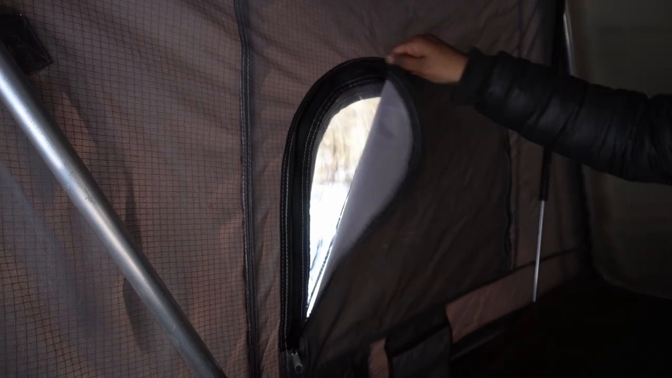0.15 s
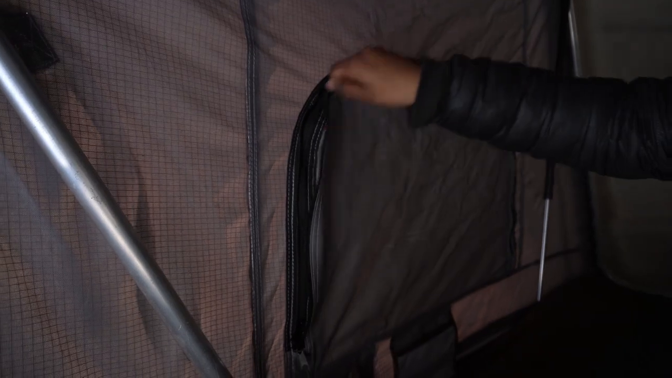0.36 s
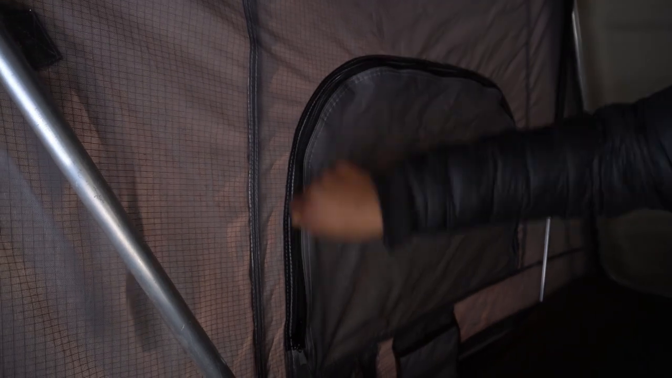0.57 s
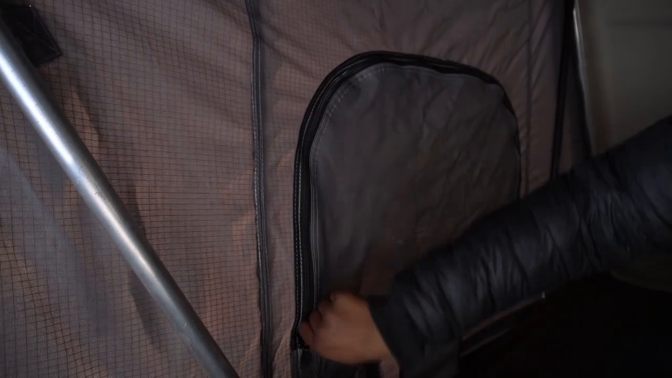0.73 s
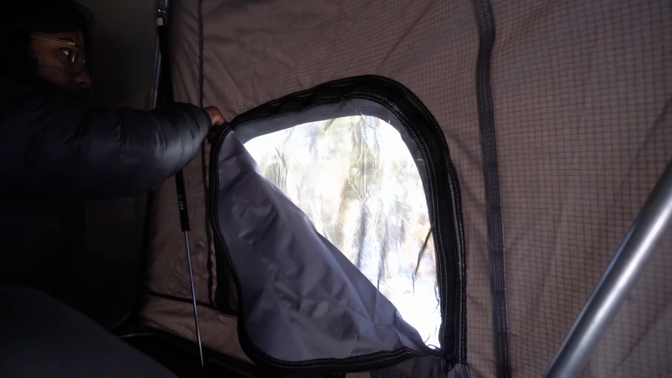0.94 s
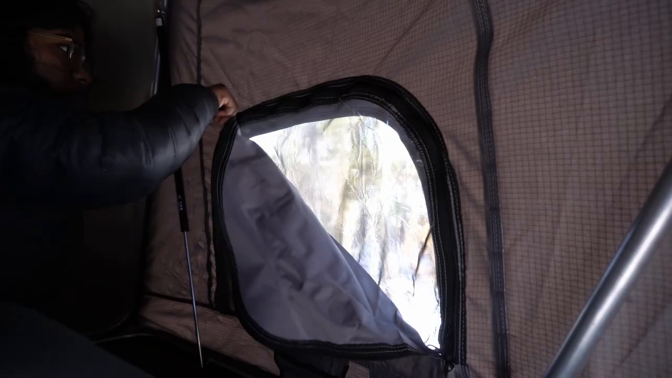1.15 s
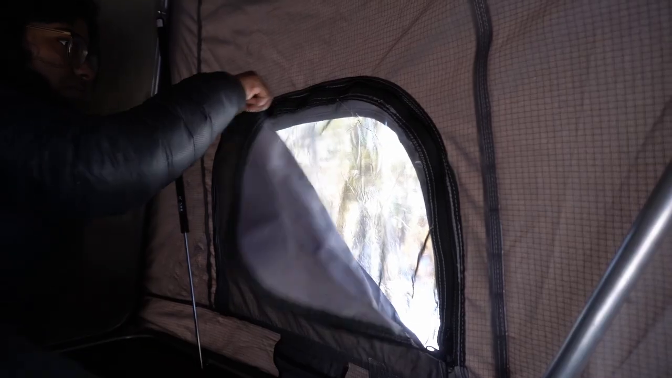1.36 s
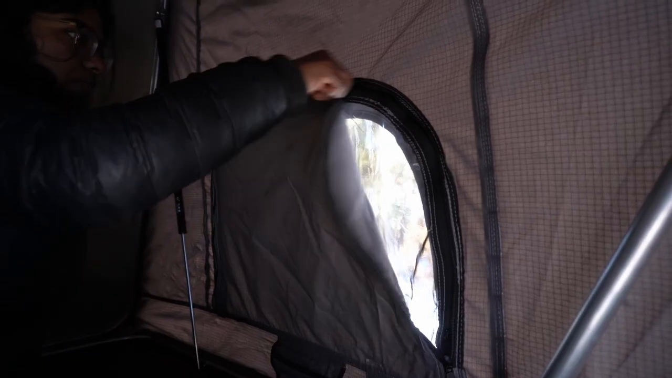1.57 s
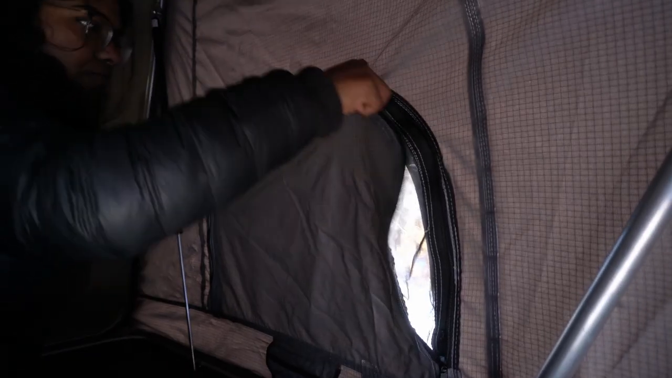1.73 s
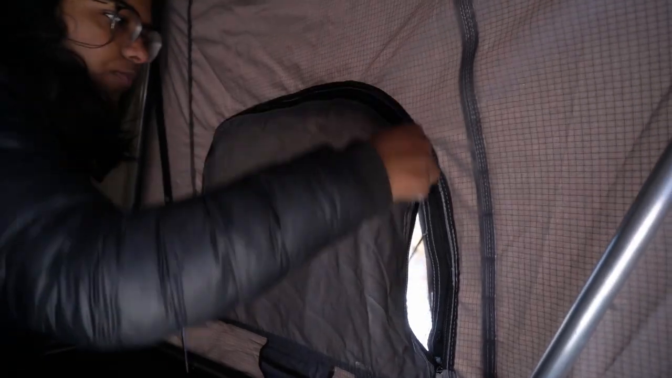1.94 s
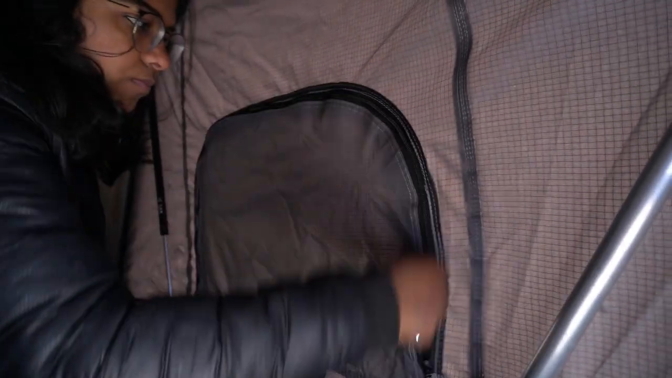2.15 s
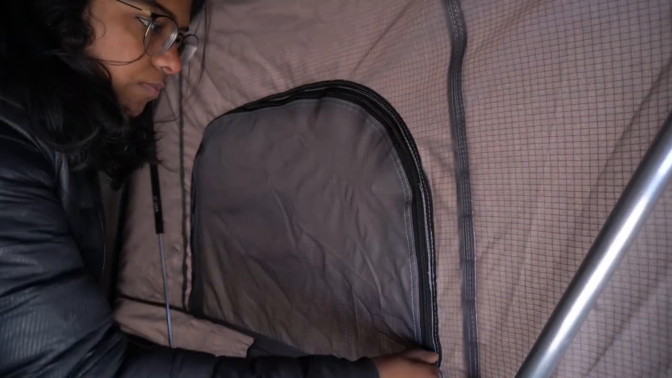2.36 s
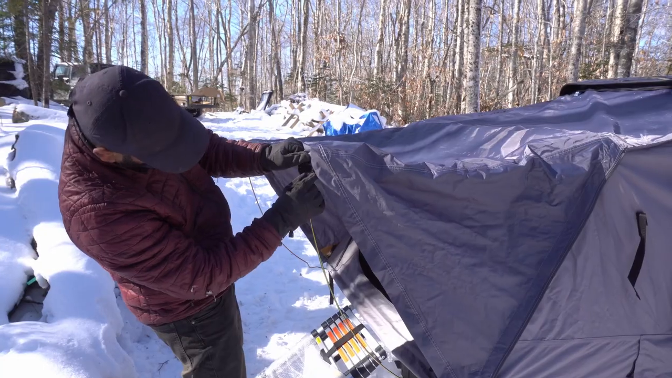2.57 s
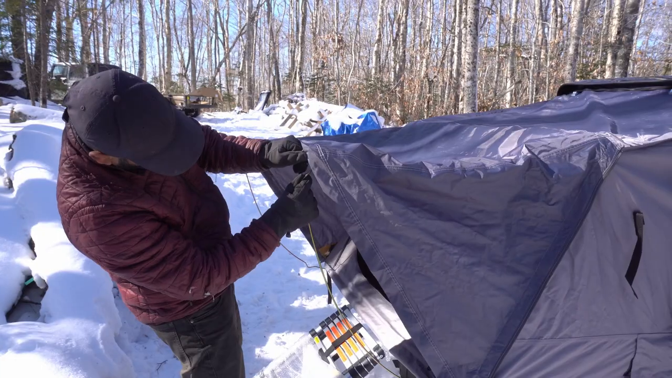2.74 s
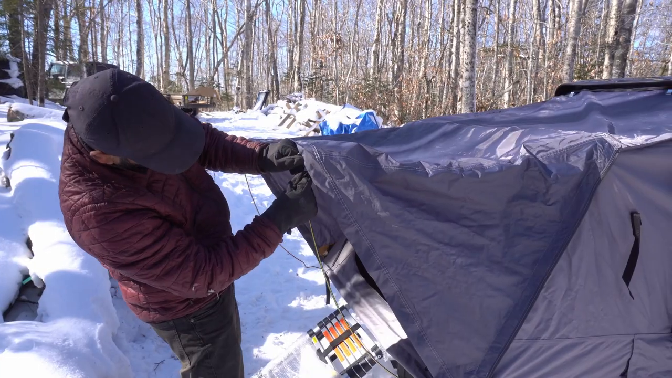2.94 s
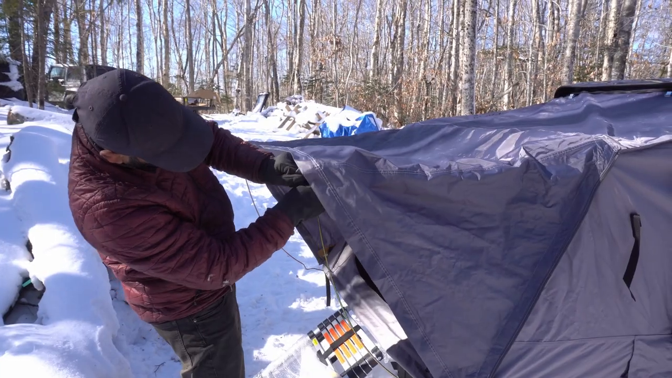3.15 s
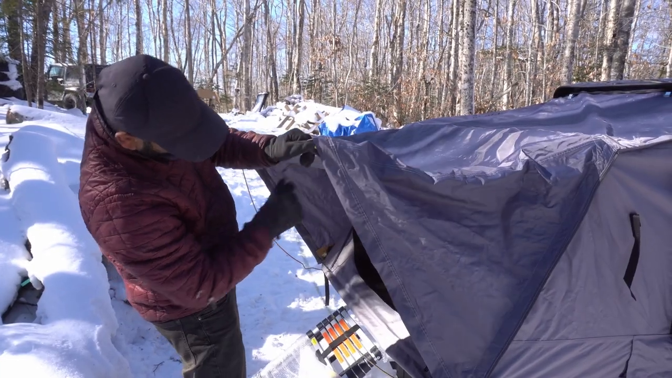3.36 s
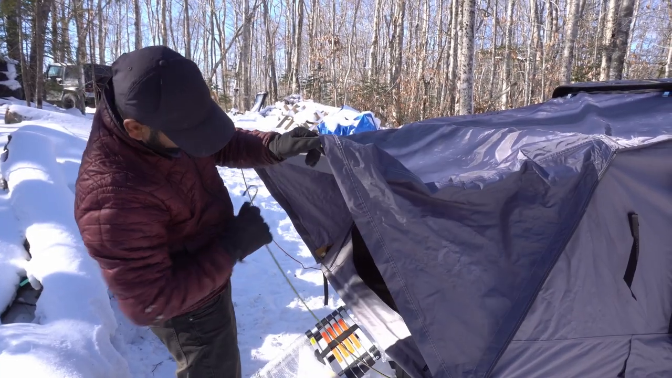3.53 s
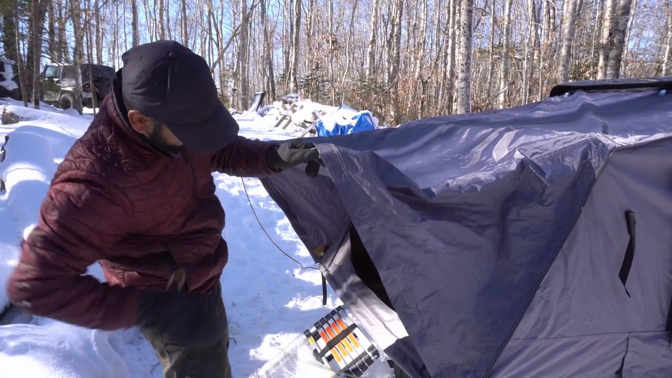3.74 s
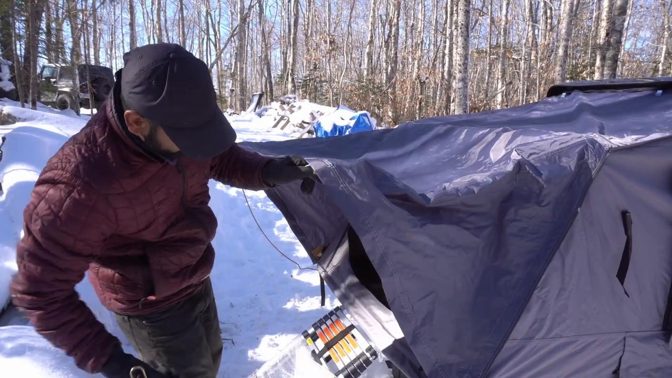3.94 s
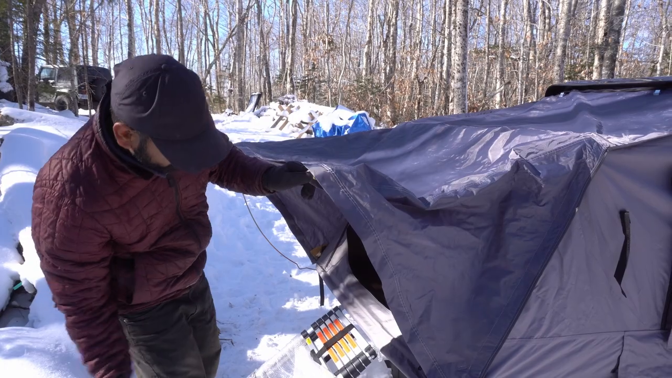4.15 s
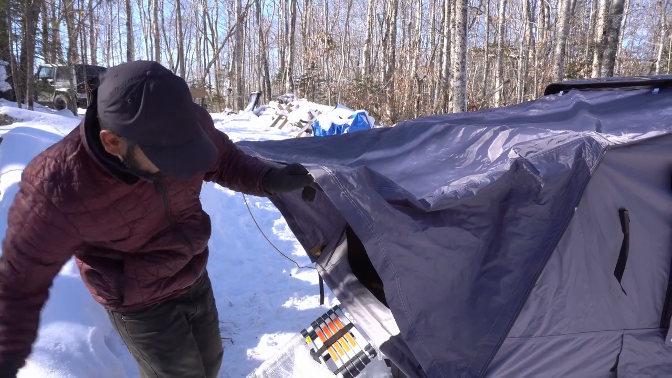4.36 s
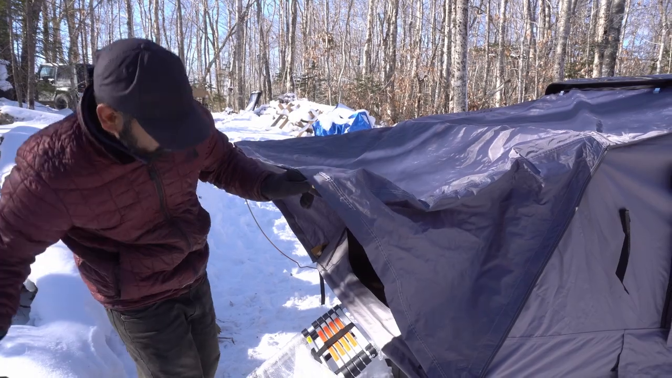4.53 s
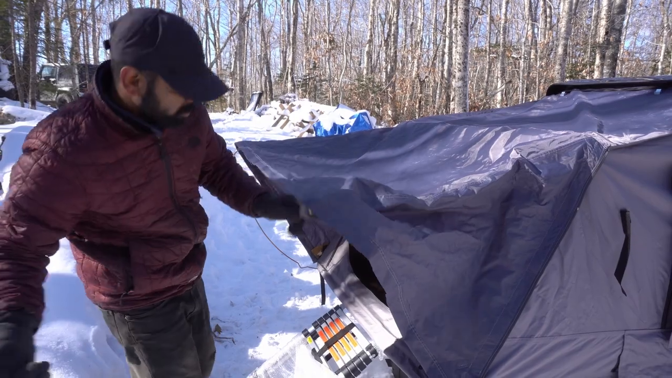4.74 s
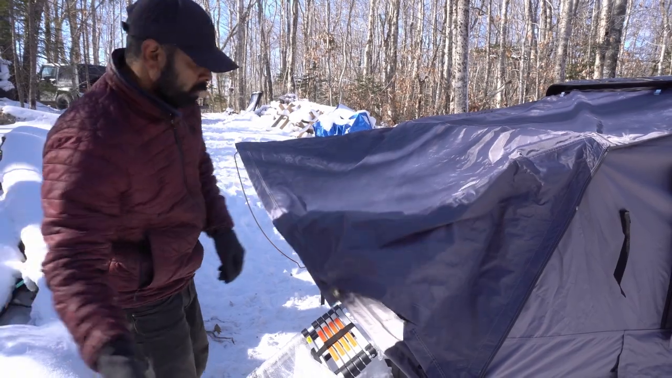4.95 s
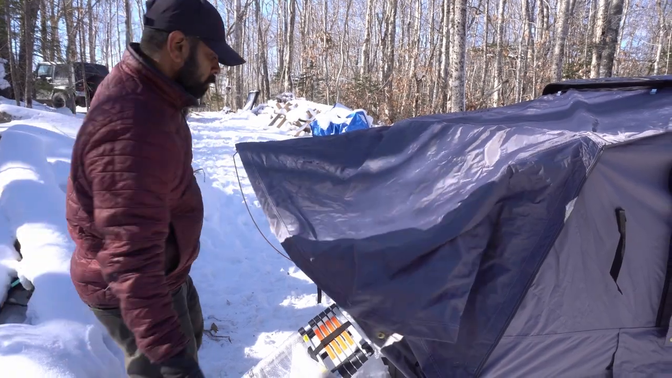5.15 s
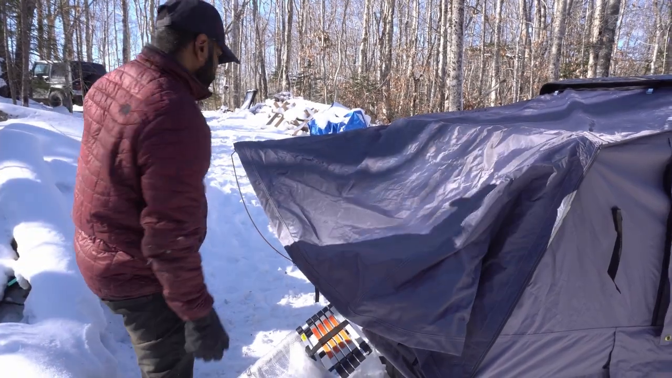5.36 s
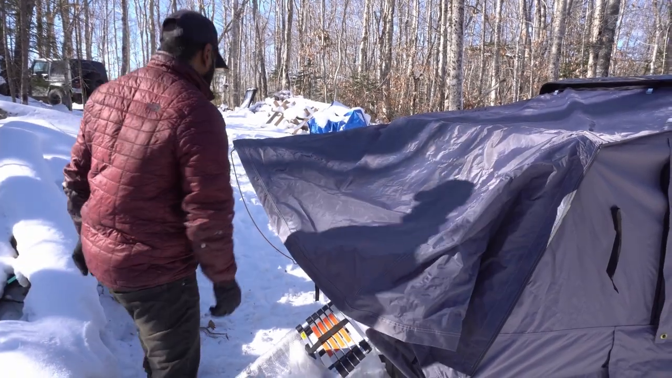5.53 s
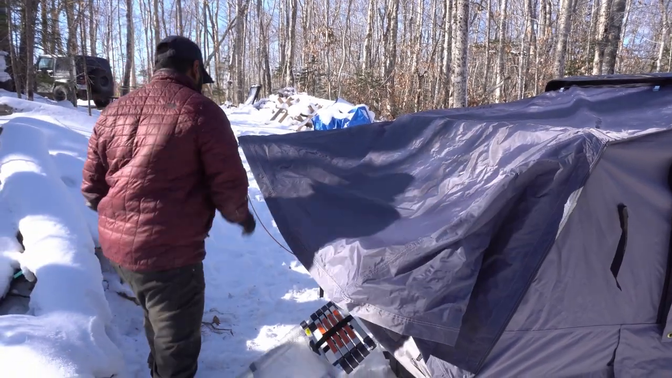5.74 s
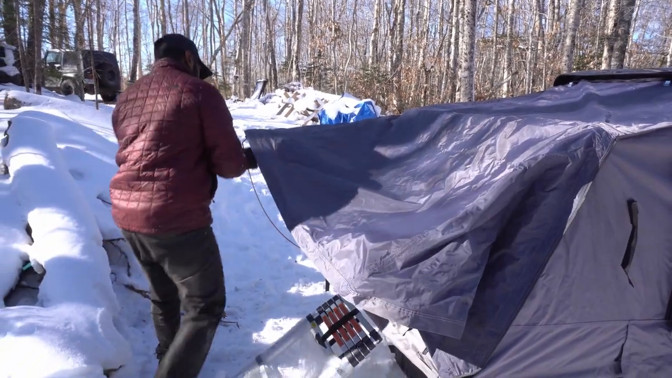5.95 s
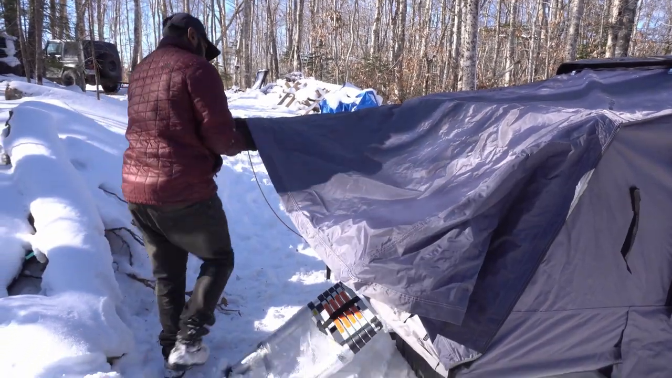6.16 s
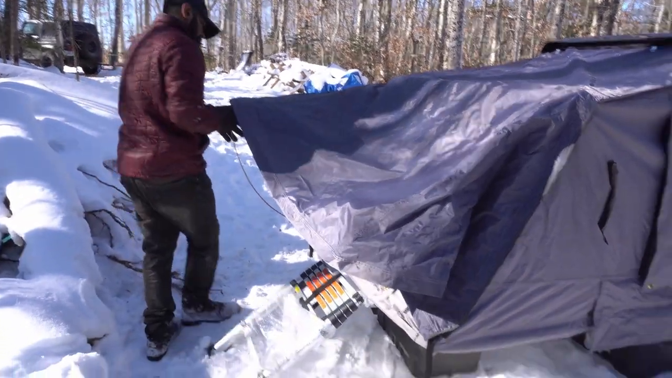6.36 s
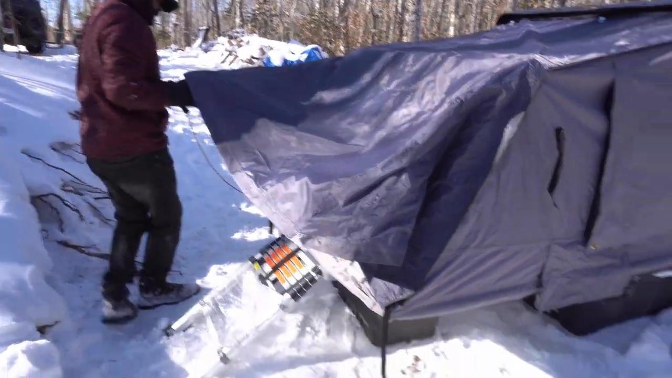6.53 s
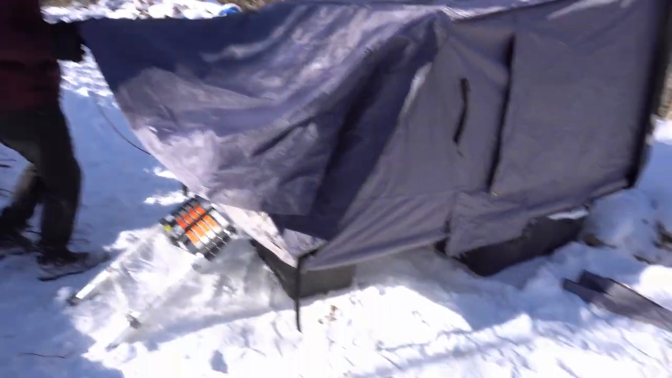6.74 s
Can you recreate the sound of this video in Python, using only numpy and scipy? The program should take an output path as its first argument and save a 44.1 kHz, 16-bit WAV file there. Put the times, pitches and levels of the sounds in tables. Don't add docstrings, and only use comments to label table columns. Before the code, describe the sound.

From 0 to 0.9 s a zipper is run shut very close by, in three quick tugs: a fast, smooth tooth buzz with a bright scraping hiss, tiny tab clinks and a sharp click at the stop. After a short gap with a cloth snap, the second zipper begins at 1.1 s with a slow, low ratchet, jumps at 1.4 s to a loud, fuller buzz drumming on loose fabric, dips near 1.8 s, then rises through two more tugs to a hard clack at 2.4 s. Outdoors, stiff nylon rustles softly, busier around 3.2-3.5 s, with small pops and ticks until 4.7 s. Snow crust crunches from 4.9 s; at 5.43 s steel pegs clash brightly and ring, with more clinks at 5.7-5.9 s. It quiens to faint rustles, swishing near 6.5 s, then a strong cloth rustle and crunchy snaps at 6.8-6.9 s. Low breeze rumble continues underneath.

```python
import sys
import numpy as np
from scipy import signal
from scipy.fft import rfft, irfft
from scipy.io import wavfile
from scipy.ndimage import uniform_filter1d, map_coordinates

SR = 44100
rng = np.random.default_rng(int(sys.argv[2]) if len(sys.argv) > 2 else 0)


def to_wav(sig):
    pcm = np.clip(np.atleast_2d(sig), -1, 1) * 32767
    pcm = np.round(pcm).astype(np.int16)
    wavfile.write(sys.argv[1], SR, pcm.T)


def decibels_to_gain(level_db):
    exponent = np.asarray(level_db, float) / 20
    return 10 ** exponent


N = 304045

# f/Hz, level/dB
TAB_MODES = [(4090, -2), (10100, -4), (12580, -3)]


def unit(x):
    return x / np.sqrt(np.mean(x ** 2) + 1e-20)


def curves(rows):
    times, *columns = np.transpose(rows)
    return [np.interp(np.arange(N) / SR, times, column) for column in columns]


def inside(rows):
    t = np.arange(N) / SR
    return np.clip(np.minimum(t - rows[0][0] + .002, rows[-1][0] - t) / .004, 0, 1)


def wobble(rate):
    at = np.arange(0, N + 16, 16)
    points = rng.standard_normal(int(N * rate / SR) + 4)
    return np.interp(np.arange(N), at, map_coordinates(points, [at * rate / SR]))


def colour(x, points):
    f, db = np.transpose(points)
    hz = np.fft.rfftfreq(8192, 1 / SR)
    gain = decibels_to_gain(np.interp(np.log(hz + 1), np.log(f), db))
    cepstrum = irfft(np.log(gain + 1e-6))
    cepstrum[1:4096] *= 2
    cepstrum[4097:] = 0
    return signal.fftconvolve(x, irfft(np.exp(rfft(cepstrum))))[:N]


def patchy(x, depth_db):
    z = signal.stft(x, nperseg=512)[2]
    field = uniform_filter1d(rng.standard_normal(z.shape), size=8, axis=0)
    field = uniform_filter1d(field, size=6, axis=1)
    return signal.istft(z * decibels_to_gain(depth_db * unit(field)), nperseg=512)[1][:N]


def zipper(tugs, press, panel, coil, gate, lumps_db, mottle_db, drum_db, hum_db,
           scrape_db, flap_db, slack_db, uneven, snag, brighten_db, loosen_db):
    # f/Hz, level/dB per Hz
    shaken_cloth = [(35, -47), (65, -6), (100, 2.5), (200, -2), (400, -4), (900, -43.5)]
    rows = sum(tugs, [])
    speed, pull_db = curves(rows)
    rate = speed * (1 + 0.011344 * wobble(50) + 0.02526 * wobble(22))
    late = np.arange(N) / SR - (rows[0][0] + rows[-1][0]) / 2
    late_1s = np.clip(late, -1, 1)

    uneven = uneven + snag * np.exp(-(np.log2(speed / 390) / 0.894) ** 2)
    jerky = .055 * np.clip(2 - rate / 130, 0, 1)
    jitter = np.clip(uneven * np.minimum(rate / 300, 1) + jerky, 0, 1)
    turns = np.cumsum(rate) / SR + jitter * (1.3 * wobble(120) + .5 * wobble(300))

    f, db = np.transpose(panel)
    teeth, power = np.zeros(N), np.zeros(N)
    for k in range(1, 8):
        panel_db = np.interp(np.log(k * rate), np.log(f), db)
        gain = decibels_to_gain(panel_db + brighten_db * np.log2(k) * late_1s)
        mottle = decibels_to_gain(mottle_db * min(k + 1, 3) / 3 * wobble(55))
        phase = k * turns + (.05 + .008 * k ** 2) * wobble(45 + 9 * k) + rng.random()
        teeth += gain * mottle * np.cos(2 * np.pi * phase)
        power += gain ** 2 / 2

    bursts = np.exp(gate * np.cos(2 * np.pi * turns))
    grit = rng.standard_normal(N) * bursts * decibels_to_gain(lumps_db * wobble(45.097))
    jingle = sum(decibels_to_gain(db) * signal.lfilter(*signal.iirpeak(hz, 40, SR), grit) for hz, db in TAB_MODES)
    lag = SR * (0.0011764 * 450 / np.clip(speed, 250, None) + 0.0001738 * wobble(6))
    rasp = grit + 0.349 * np.interp(np.arange(N) - lag, np.arange(N), grit)
    rough = unit(patchy(colour(rasp, coil), depth_db=1.8))
    tab_buzz = .04 * unit(jingle * decibels_to_gain(8 * wobble(9)))
    scrape = decibels_to_gain(scrape_db + curves(press)[0]) * unit(rough + tab_buzz)

    rumble_db = flap_db + loosen_db * late_1s - slack_db * np.log2(speed / 450)
    rumble_db = rumble_db + 0.147 * (pull_db + 23.5) + 1.11 * wobble(18)
    rumble = decibels_to_gain(rumble_db) * unit(colour(rng.standard_normal(N), shaken_cloth))

    drum_db = drum_db - 9 * np.log2(np.maximum(speed, 300) / 400)
    drum = decibels_to_gain(drum_db) * unit(colour(grit, panel))
    hum_db = hum_db + 34 * np.clip(late, -1, .2) - 17 * np.log2(speed / 400) ** 2
    drum += decibels_to_gain(hum_db) * unit(signal.lfilter(*signal.iirpeak(1040, 14, SR), grit))
    return inside(rows) * (decibels_to_gain(pull_db - 2) * (teeth / np.sqrt(power) + drum) + scrape + rumble)


def near_zipper():
    # t/s, speed/teeth per s, pull level/dB
    near_tugs = [
        [(0, 470, -33), (.1, 427.3, -34.5), (.2, 512.7, -37), (.29, 424.4, -36), (.33, 510, -37.5),
         (.39, 270, -38)],
        [(.45, 346.7, -40.5), (.585, 516.3, -35.5), (.635, 419, -35.5), (.665, 587, -28), (.702, 454, -32)],
        [(.74, 640, -34.5), (.808, 568, -35), (.822, 561, -33.5), (.865, 412, -35), (.886, 120, -59.5)],
    ]
    # t/s, scrape level/dB
    near_press = [(0.0, -45.5), (0.148, -42.5), (0.32, -41), (0.384, -41.5), (0.414, -39.5), (0.746, -39),
                  (0.772, -40), (0.868, -39), (0.886, -61)]
    # f/Hz, level/dB
    near_panel = [(60, -28.5), (200, 24), (450, 1), (950, -2.5), (1300, -5), (1800, -6.5), (3500, -15),
                  (6000, -19.5)]
    # f/Hz, level/dB per Hz
    near_scrape = [(400, -6), (1000, 1.5), (1800, -2), (2800, -10), (4500, -4), (7000, -6.5),
                   (11000, -13.5), (16000, -16)]
    near_coil = dict(scrape_db=-2, flap_db=-52.5, slack_db=5, uneven=0.0525, snag=0.0069, brighten_db=5, loosen_db=16.5)
    return zipper(near_tugs, near_press, near_panel, near_scrape, gate=0.79, lumps_db=1.5,
                  mottle_db=4.5, drum_db=-33.5, hum_db=-57.5, **near_coil)


def far_zipper():
    # t/s, speed/teeth per s, pull level/dB
    far_tugs = [
        [(1.088, 129.6, -63), (1.14, 141.2, -43.5), (1.19, 151.6, -29), (1.31, 142.5, -33),
         (1.405, 149.7, -25.5)],
        [(1.42, 395.2, -27.5), (1.46, 388.1, -24), (1.5, 491.5, -25), (1.582, 760, -31.5), (1.622, 611.5, -22),
         (1.664, 635.7, -31), (1.692, 487.2, -24.5), (1.73, 370.9, -36.5), (1.82, 139.6, -46)],
        [(1.87, 199.4, -46.5), (1.914, 290.4, -31.5), (1.956, 347.4, -28.5), (2.03, 425.6, -29.5),
         (2.108, 378.1, -40)],
        [(2.14, 542.9, -32), (2.192, 447, -31), (2.256, 483.6, -33.5), (2.3, 675, -32.5), (2.34, 813.1, -33.5),
         (2.375, 860, -37), (2.401, 495, -53)],
    ]
    # t/s, scrape level/dB
    far_press = [(1.088, -50.5), (1.134, -37.5), (1.284, -42), (1.681, -37.5), (1.778, -54), (1.946, -45),
                 (2.315, -36), (2.374, -26.5), (2.401, -57.5)]
    # f/Hz, level/dB
    far_panel = [(60, -51), (150, -14), (290, 10), (480, 7.5), (780, -6.5), (1050, -13), (1800, -9.5),
                 (4500, -26)]
    # f/Hz, level/dB per Hz
    far_scrape = [(400, -1.5), (880, 2.5), (1040, -0.5), (1250, 0.5), (1800, -1), (4000, -4), (7000, -11.5),
                  (16000, -26.5)]
    far_coil = dict(scrape_db=1, flap_db=-46, slack_db=7, brighten_db=4.5, loosen_db=12, uneven=.03, snag=.07)
    return zipper(far_tugs, far_press, far_panel, far_scrape, gate=0.43, lumps_db=2.0,
                  mottle_db=3.5, drum_db=-6.5, hum_db=-17.5, **far_coil)


def ring(out, s, peak_db, ring_db, modes, length, t60, crack_db, faint=0):
    t = np.arange(int((length + .15) * SR)) / SR
    hz, level = np.transpose(modes)
    hz = np.append(hz, 3300 * 4.7 ** rng.random(faint))[:, None]
    level = np.append(level - level.max(), rng.uniform(-19, -9, faint))[:, None]
    luck_a, luck_b, luck_c = rng.standard_normal((3, len(hz), 1))
    level = level + 1.5 * luck_a - 3 * (hz < 4500)
    swing = 1 + .35 * np.sin(2 * np.pi * 22 * luck_c * t + 3 * luck_b)
    life = t60 * np.minimum(6000 / hz, 1) ** .5 * np.exp(.15 * luck_b)
    waver = 1.1 * np.sin(2 * np.pi * (14 * luck_a + 30 * luck_c * t) * t + luck_b)
    tone = decibels_to_gain(level - 60 * t / life) * swing * np.sin(2 * np.pi * hz * t + 9 * luck_b + waver)
    mute = decibels_to_gain(-60 * np.maximum(t - length, 0) / .12) * (1 - np.exp(-t / .002))
    crack = signal.lfilter([0.44, -0.69, -0.76, 0.28], [1, -.2], rng.standard_normal(len(t)))
    crack = crack * decibels_to_gain(crack_db - 60 * t / .045)
    contact = decibels_to_gain(peak_db) * (decibels_to_gain(ring_db) * tone.sum(axis=0) * mute + crack)
    return out + np.pad(contact, (round(s * SR), N))[:N]


def pull_tab():
    # t/s, peak level/dB, ring level/dB
    tab_hits = [
        (0.029, -41.5, -0.5),
        (.455, -45, -13.5),
        (0.591, -45.5, -1.5),
        (.632, -46.5, -10),
        (0.864, -14.5, -34.5),
        (0.9062, -38.5, -22),
        (2.318, -45, 5.5),
        (2.3622, -8, -25.5),
        (2.402, -49, -6),
    ]
    out = np.zeros(N)
    for s, db, ring_db in tab_hits:
        out = ring(out, s, db, ring_db, TAB_MODES, length=0.04, t60=0.2, crack_db=-15)
    return out


def creases(activity, count, pitch_hz, cycles):
    luck = rng.random((count, 3))
    at = np.searchsorted(np.cumsum(activity) / activity.sum(), luck[:, 0])[:, None]
    hz = np.clip(pitch_hz * np.exp(0.7195 * rng.standard_normal((count, 1))), 400, 9000)
    t = np.arange(220) / SR
    size = decibels_to_gain(np.minimum(-4.5 * np.log(luck[:, 1:2]), 11)) * np.sign(luck[:, 2:] - .5)
    grains = size * np.sin(2 * np.pi * hz * t) * np.exp(-t * hz / cycles)
    return unit(np.bincount((at + np.arange(len(t))).ravel(), grains.ravel(), N + 300)[:N])


def swells(rows, calm_db):
    s, db, rise, fall = np.transpose(rows)[:, :, None]
    late = np.arange(0, N + 64, 64) / SR - s
    drop_db = 10 * np.where(late < 0, -late / rise, late / fall)
    power = decibels_to_gain(2 * (db - drop_db)).sum(axis=0) + decibels_to_gain(2 * calm_db)
    return np.interp(np.arange(N), np.arange(len(power)) * 64, 10 * np.log10(power))


def fly():
    # t/s, level/dB, rise/s per 10 dB, fall/s per 10 dB
    stirs = [(.88, -58.5, .01, .04), (1.06, -65, .02, .03), (2.4, -54, .01, .04), (2.545, -54, .04, .06),
             (2.75, -60.5, .05, .05), (3.015, -59, .04, .03), (3.09, -64.5, .05, .05),
             (3.19, -47.5, .008, .04), (3.252, -45.5, .03, .04), (3.29, -51, 0.018, .03),
             (3.36, -53, .06, .1), (3.412, -49, .04, .035), (3.487, -50, .015, .012), (3.54, -57, .02, .04),
             (3.68, -51.5, 0.064, .09), (3.82, -56, .06, .12), (3.95, -56, .08, .1),
             (4.12, -62.5, .08, .12), (4.29, -56.5, .05, .06), (4.47, -65, .1, 0.14), (4.88, -58, .09, .04),
             (4.95, -52.5, .03, .04), (5.02, -53, 0.027, .1), (5.13, -52.5, .03, 0.066),
             (5.25, -55, .04, 0.045), (5.33, -50, .015, .04), (5.41, -46, .04, .06), (5.6, -55.5, .2, .3),
             (5.88, -57.5, .1, .15), (6.44, -53, .02, .05), (6.5, -54, .05, .035), (6.585, -55, .05, .1),
             (6.89, -46, .09, 0.074)]
    # t/s, level/dB, rise/s per 10 dB, fall/s per
    # 10 dB
    swishes = [(2.4, -27, 0.0084, 0.0223), (3.26, -36, 0.042, 0.014), (3.4, -47, 0.116, 0.047),
               (4.29, -43.5, 0.062, 0.023), (5.03, -51.5, .1, 0.32), (5.45, -26, 0.022, .1),
               (5.76, -28, 0.08, 0.144), (6.21, -44.5, 0.0108, 0.026), (6.405, -39.5, 0.013, 0.0098),
               (6.46, -37.5, 0.027, 0.059), (6.5, -32.5, 0.034, 0.0174)]
    # f/Hz, level/dB
    nylon_colour = [(250, -18), (600, 0), (1500, -1), (3200, -5), (6500, -13), (16000, -40)]
    # f/Hz, level/dB per Hz
    body_colour = [(70, -6.5), (130, -1), (250, 11.5), (600, 5), (1000, -74.5)]
    # f/Hz, level/dB
    sheen_colour = [(2500, -20), (5000, -1), (9000, -2), (16000, -8)]
    rustle_db = swells(stirs, calm_db=-73)
    body_db = swells(stirs, calm_db=-68) - 1
    sheen_db = swells(swishes, calm_db=-59) - 16.5
    clump = wobble(30)
    folds = creases(decibels_to_gain(.4 * rustle_db + 4 * clump), count=3400, pitch_hz=2600, cycles=1.1)
    folds = unit(signal.lfilter([1], [1, -.6], folds))
    slide = unit(colour(rng.standard_normal(N) * decibels_to_gain(2.2 * clump), nylon_colour))
    rustle = decibels_to_gain(rustle_db) * (slide + 1.1 * folds)
    body_db = body_db + 2.07 * wobble(25) + 0.35 * clump
    body = decibels_to_gain(body_db) * unit(colour(rng.standard_normal(N), body_colour))
    sheen = decibels_to_gain(sheen_db + 0.5 * clump) * unit(colour(rng.standard_normal(N), sheen_colour))
    return rustle + body + sheen


def snaps():
    # t/s,
    # peak level/dB, f/Hz, edge level/dB
    snap_events = [(1.057, -32, 1504, -11), (1.326, -11.5, 1840, -14), (2.121, -20, 1497, 2.5),
                           (2.518, -32.5, 697.7, -7.5), (2.541, -25.5, 1465, -10), (2.746, -24.5, 1110, -11.5),
                           (2.766, -33.5, 765, -9.5), (3.081, -25, 706, -18), (3.177, -26.5, 766, -21),
                           (3.41, -30.5, 655, -7), (3.488, -20.5, 1320, -24.5), (3.649, -23.5, 1660, -29),
                           (3.676, -27.5, 2200, -4.5), (3.686, -30, 1400, -25.5), (3.888, -29, 1300, -26.5),
                           (3.693, -36.5, 775, 11), (3.729, -44.5, 635, 10.5), (3.8, -18.5, 1720, -40),
                           (4.015, -20, 1393, -16.5), (4.142, -19.5, 2420, -27.5), (4.188, -33.5, 1320, -12.5),
                           (4.283, -19.5, 1980, -33.5), (4.319, -30.5, 1540, 3), (4.35, -32.5, 814, -4.5),
                           (4.409, -22.5, 1346, -38), (4.45, -31.5, 760, -9.5), (4.561, -26, 1330, -18),
                           (4.678, -33, 630, -7),
                           (4.926, -31, 2500, -1), (4.943, -31, 1180, -8), (4.949, -13, 2770, -42.5),
                   (4.986, -31, 1875, 1.5), (4.995, -39.5, 870, 12.5), (5.019, -19.5, 830, -11),
                   (5.124, -31.5, 740, -4), (5.143, -20, 886, -12.5), (5.156, -20.5, 794, -11.5),
                   (5.182, -16.5, 3320, -7.5), (5.247, -18.5, 990, -14), (5.276, -18, 2180, -19),
                   (5.321, -13, 1167, -8), (5.331, -13.5, 1290, -28), (5.362, -19, 1620, -8),
                   (5.394, -41, 945, -22), (5.406, -15.5, 1950, -8), (5.412, -26.5, 1650, -2),
                   (5.427, -6, 3870, -33), (6.337, -33, 1180, -9), (6.712, -34, 1000, -6.5),
                   (6.831, -18.5, 1252, -22.5), (6.841, -7.5, 1404, -35.5), (6.875, -9, 1730, -37),
                   (6.882, -15, 1360, -36.5)]
    out, t = np.zeros(N + SR), np.arange(1200) / SR
    for s, db, hz, edge_db in snap_events:
        noise = rng.standard_normal((2, len(t)))
        knock = -np.sin(2 * np.pi * hz * t) * np.exp(-t * hz / 0.773)
        edge = decibels_to_gain(edge_db + 8 - 60 * t / .008) * signal.lfilter([.3, .3], [1, -.72], noise[0])
        dull = np.clip(-edge_db / 25, 0, .8)
        edge = signal.lfilter([1 - dull], [1, -dull], edge)
        crumbs = uniform_filter1d(noise[1], size=max(2, int(SR / hz / 3)))
        crumble = 0.454 * decibels_to_gain(-60 * t / .025) * uniform_filter1d(crumbs, size=4)
        onset = 1 - np.exp(-t / 0.0001)
        out[round(s * SR):][:len(t)] += decibels_to_gain(db - 4.5) * (knock + edge + crumble) * onset
    return out[:N]


def pegs():
    # f/Hz, level/dB
    notes_a = [(2993, -61), (3553, -55), (3666, -59), (3790, -59), (4274, -60), (4678, -61), (5211, -52),
               (5324, -52), (5577, -51), (5669, -54), (5905, -54), (6094, -56), (6498, -56), (7133, -58),
               (7537, -54), (7720, -52), (8280, -56), (8581, -57), (8667, -60), (8974, -56), (9388, -56),
               (9954, -54), (10293, -63), (10562, -58), (10713, -57), (10944, -59), (11326, -52),
               (11929, -55), (12134, -60), (12500, -51), (12748, -55), (12893, -52), (13071, -60),
               (13512, -60), (13582, -61), (13770, -58), (13889, -55), (14142, -59), (14906, -66),
               (15353, -62)]
    notes_b = [(2993, -63), (4285, -52), (5190, -43), (5830, -47), (6137, -49), (6751, -46), (7230, -42),
               (7531, -50), (7720, -52), (8236, -53), (8958, -45), (9388, -48), (9658, -41), (9986, -47),
               (10293, -48), (10567, -49), (10907, -44), (11348, -48), (11601, -48), (11919, -49),
               (12758, -41), (12882, -46), (13071, -41), (13674, -40), (13835, -41), (14142, -41),
               (14713, -58), (15014, -51), (15192, -53), (15719, -66)]
    notes_c = [(2000, -13), (2780, 0), (5891, -5), (7231, -12), (8300, -14), (8888, -5), (9520, -6),
               (9942, -13), (10749, 0), (12906, -12), (13906, -13), (14936, -15), (15503, -7)]
    notes_d = [
        (5891, 0),
    ]
    notes_e = [(3198, -61), (4290, -61), (5674, -47), (5841, -50), (6632, -64), (7197, -56), (7531, -60),
               (7698, -68), (8247, -61), (8672, -56), (8974, -52), (9663, -44), (9948, -45), (10287, -63),
               (10562, -55), (10729, -57), (10950, -51), (11332, -59), (11601, -60), (11924, -49),
               (12758, -38), (13076, -61), (13668, -52), (13765, -45), (14142, -63), (14718, -62),
               (15181, -65), (15472, -74)]
    notes_f = [(4285, -60), (5889, -60), (6778, -60), (7251, -57), (8215, -59), (8597, -63), (8985, -64),
               (9399, -59), (9668, -54), (9959, -55), (10562, -56), (10923, -66), (11332, -64),
               (11929, -57), (12505, -57), (12678, -57), (13081, -57), (13668, -57), (14153, -60),
               (15025, -68)]
    # t/s, peak level/dB, ring level/dB, time until muted/s
    hits_a = [
        (5.4253, -12, -25.5, 0.26),
        (5.4466, -14, -30.5, 0.25),
        (5.6765, -24.5, -17, 0.21),
    ]
    hits_b = [
        (5.7099, -19.5, -15.5, 0.071),
    ]
    hits_c = [
        (4.277, -37, -14, 0.0986),
    ]
    hits_d = [
        (4.36, -66.5, 2.9, 0.19),
        (5.76, -52, 3.9, 0.402),
    ]
    hits_e = [
        (5.762, -24, -4, 0.017),
        (5.7995, -21.5, -10.5, 0.172),
    ]
    hits_f = [
        (5.912, -24.5, -20, 0.104),
    ]
    # contacts, notes, ring time/s, number of faint extra notes
    groups = ((hits_a, notes_a, 1.1, 40), (hits_b, notes_b, .8, 20), (hits_e, notes_e, .65, 14),
              (hits_f, notes_f, .3, 6), (hits_c, notes_c, .5, 0), (hits_d, notes_d, 1.1, 0))
    out = np.zeros(N)
    for hits, modes, t60, count in groups:
        for s, db, ring_db, length in hits:
            out = ring(out, s, db, ring_db, modes, length, t60, crack_db=-11, faint=count)
    return out


def ticks():
    # t/s, peak level/dB, f/Hz
    tick_events = [(1.0906, -32, 1580), (1.4071, -36.5, 1850), (1.852, -30.5, 1897), (1.875, -32, 1970),
                   (1.8937, -31, 1970), (1.9584, -26.5, 1540), (1.9868, -25, 1927), (2.0546, -38, 2709),
                   (2.0761, -24.5, 2504), (2.5482, -34.5, 1340), (3.0087, -50.5, 2650), (3.1863, -37, 1690),
                   (3.205, -47.5, 1200), (3.2832, -38, 1200), (3.292, -43.5, 1290), (3.3614, -47, 1220),
                   (3.4188, -35.5, 3330), (3.458, -37, 1240), (3.534, -42.5, 1810), (3.554, -43.5, 1330),
                   (3.6105, -48, 5520), (3.6224, -41, 1970), (3.915, -55.5, 1680), (3.9707, -40, 1180),
                   (3.99, -43, 1420), (4.0627, -41.5, 1230), (4.129, -40, 2420), (4.1701, -40.5, 1370),
                   (4.229, -43.5, 1520), (4.247, -44.5, 2460), (4.287, -29.5, 2000), (4.2988, -35, 1500),
                   (4.3634, -54, 5890), (4.548, -44, 1270), (4.589, -41.5, 1360), (4.794, -46.5, 1200),
                   (4.825, -44, 1390), (4.846, -42, 1500), (5.038, -34.5, 1670), (5.113, -33.5, 1550),
                   (5.13, -30.5, 2320), (5.1729, -35.5, 1500), (5.2285, -40.5, 1440), (5.2678, -45, 5960),
                   (5.2876, -33.5, 2880), (5.3011, -42, 4150), (5.3792, -35, 5500), (5.555, -45, 520),
                   (5.576, -57, 600), (5.692, -37.5, 660), (6.286, -46, 625), (6.425, -47, 500),
                   (6.511, -41.5, 500), (6.581, -39, 645), (6.3663, -44, 1330), (6.4057, -41.5, 3900),
                   (6.769, -43.5, 3037), (6.819, -38.5, 696), (6.846, -26.5, 1265)]
    out, t = np.zeros(N + SR), np.arange(600) / SR
    for s, db, hz in tick_events:
        burst = (rng.standard_normal(len(t)) + 3 * (t == 0)) * decibels_to_gain(-60 * t / 0.0146)
        burst = signal.lfilter(*signal.iirpeak(hz, 0.9, SR), burst)
        burst = signal.lfilter(*signal.butter(1, 7000 / SR * 2), burst)
        out[round(s * SR):][:len(t)] += decibels_to_gain(db + 2) * burst / np.abs(burst).max()
    return out[:N]


def thumps():
    # t/s, peak level/dB, f/Hz, time to fade by 60 dB/s
    pushes = [
        (.872, -42, 130, 0.098),
        (1.053, -53, 302, 0.05),
        (3.03, -48, 110, .08),
        (3.188, -33, 217, 0.04),
        (3.832, -43, 213, 0.1),
        (3.94, -43, 200, .08),
        (3.945, -44, 128, 0.08),
    ]
    out, t = np.zeros(N + SR), np.arange(SR // 4) / SR
    for s, db, hz, t60 in pushes:
        swing = decibels_to_gain(db + 7 - 60 * t / t60) * np.sin(2 * np.pi * hz * t)
        out[round(s * SR):][:len(t)] += swing * (1 - np.exp(-t / 0.00057))
    return out[:N]


def air():
    # t/s, level/dB
    breeze = [(0.0, -47.5), (1.06, -49.5), (2.84, -46), (2.9, -50), (3.17, -45.5), (4.28, -51),
              (4.45, -47.5), (5.39, -55), (6.79, -46), (6.89, -39.5)]
    # f/Hz, level/dB per Hz
    gust_colour = [(7.1, -33.5), (12, 5), (32, 4), (51, -10), (81, -19.5), (200, -29.5), (260, -52),
                   (440, -120)]
    # f/Hz, level/dB per Hz
    woods_colour = [(59, -28.5), (100, 10.5), (200, 4.5), (800, -13.5), (4000, -7.5), (8000, -23.5),
                    (13000, -23.5), (16000, -56.5)]
    gusts = decibels_to_gain(wobble(5.1)) * colour(rng.standard_normal(N), gust_colour)
    gusts = decibels_to_gain(curves(breeze)[0]) * unit(gusts)
    woods = decibels_to_gain(-64 + 0.58 * wobble(22)) * unit(colour(rng.standard_normal(N), woods_colour))
    return gusts + woods


def echoes(x, t60, wet_db):
    t = np.arange(int(.2 * SR)) / SR
    tail = rng.standard_normal(len(t)) * decibels_to_gain(-60 * t / t60) * (t > .002)
    return x + decibels_to_gain(wet_db) * signal.fftconvolve(x, tail / np.linalg.norm(tail))[:N]


def scene():
    tent = echoes(near_zipper() + far_zipper() + pull_tab(), t60=0.0442, wet_db=-9.5)
    yard = echoes(snaps() + ticks() + pegs(), t60=.04, wet_db=-10)
    return (tent + yard + fly() + thumps() + air())[None]


def low_pass(x):
    return signal.sosfilt(signal.butter(12, 16990, fs=SR, output="sos"), x)


def record(dry):
    hz = np.fft.rfftfreq(N, 1 / SR)
    mix = irfft(rfft(dry) * np.clip((15810 - hz) / 700, 0, 1), N)
    return low_pass(mix)


dry = scene()
out = record(dry)
to_wav(out)
```